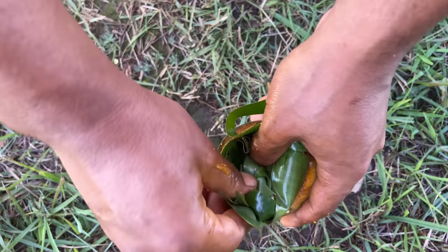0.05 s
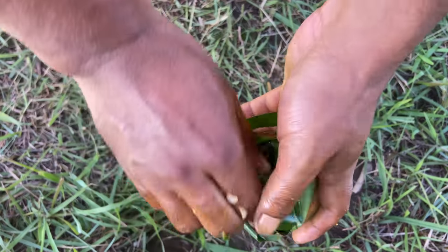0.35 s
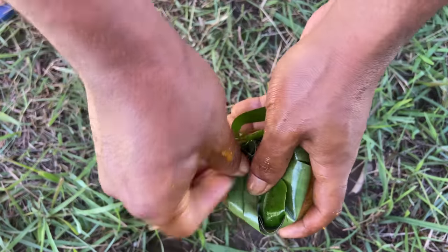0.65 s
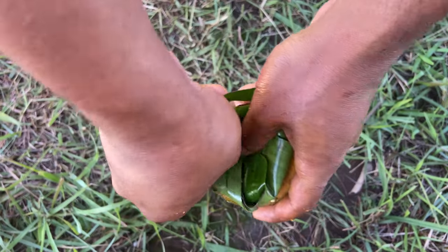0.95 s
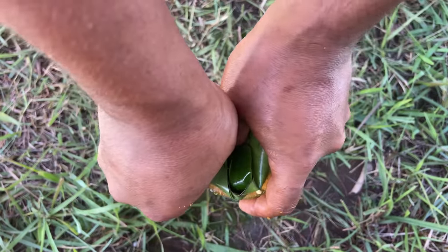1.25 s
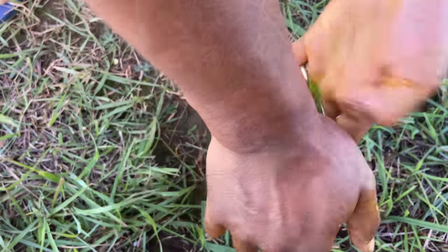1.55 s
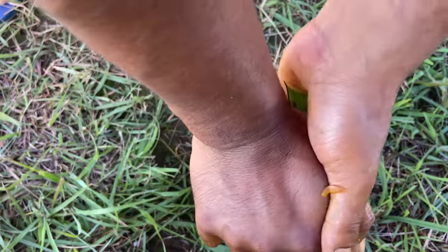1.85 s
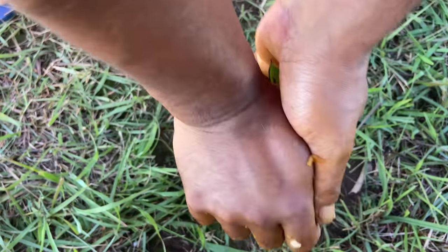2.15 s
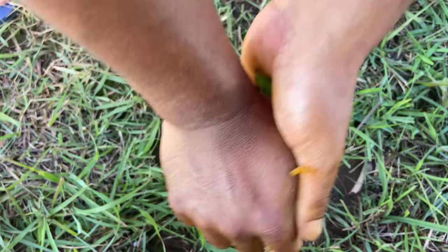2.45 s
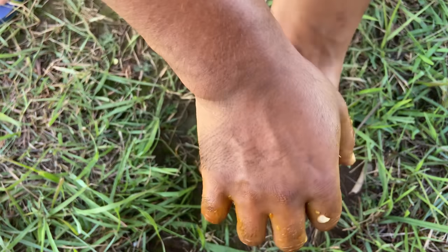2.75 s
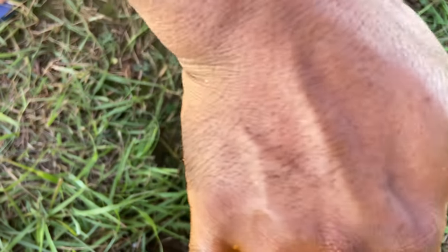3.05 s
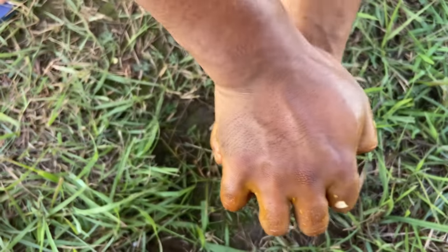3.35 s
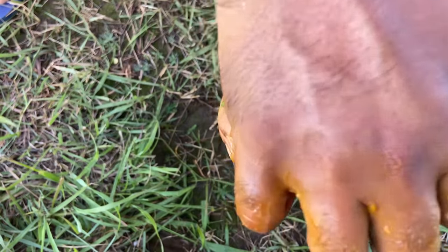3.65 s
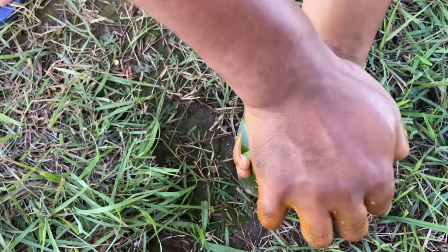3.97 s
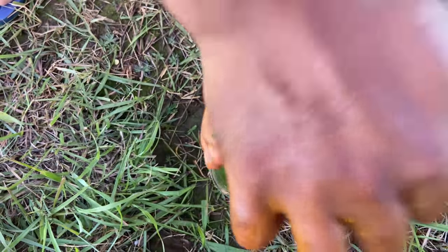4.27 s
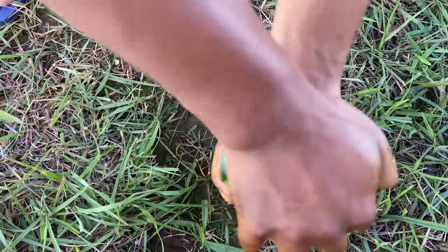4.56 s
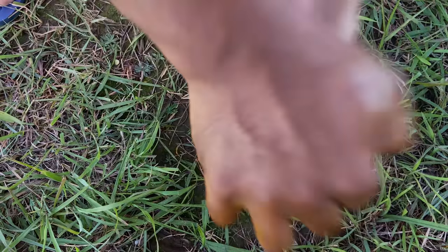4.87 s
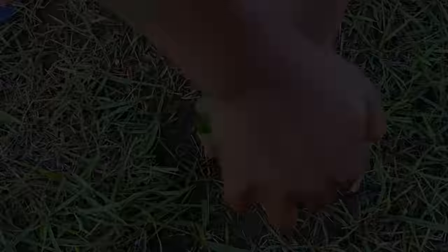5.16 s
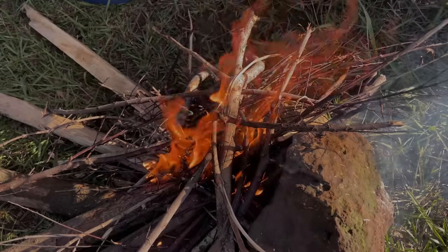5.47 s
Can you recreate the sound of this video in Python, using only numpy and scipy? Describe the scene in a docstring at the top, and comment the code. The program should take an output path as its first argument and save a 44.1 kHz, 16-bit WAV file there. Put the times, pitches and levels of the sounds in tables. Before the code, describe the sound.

Leaf veins crack in quick, sharp clusters while waxy leaves slide over each other, heard close and dry outdoors. Quieter, muffled kneading follows as damp palms press the folded bundle, broken by one more sharp snap. Then a cupped hand pats the packet four times, the last one softer. Everything fades out, and the faint hiss and rumble of a small fire appears at the very end with one twig tick.

```python
"""Leaf veins snap crisply as two hands fold fresh green leaves into a packet, close by, outdoors over grass.
Blades slide over each other in stick-slip friction, trapped air pops, and the palms knead the bundle
and pat it four times. The recorder delays the bass, so each pat is a falling pop.
The scene fades out and a small wood fire fades in."""
import sys
import numpy as np
from scipy import signal
from scipy.fft import rfft, irfft
from scipy.io import wavfile
from scipy.ndimage import uniform_filter1d

SR = 44100
rng = np.random.default_rng(int(sys.argv[2]) if len(sys.argv) > 2 else 0)


def transcribe(u):
    """Save the signal u as a 16-bit wav file named by the first command-line argument.

    u: samples, shape (n,) or (channels, n), limited to [-1, 1]; the rate is SR.
    q: integer samples, one column per channel.
    """
    v = np.clip(np.atleast_2d(u).T, -1, 1)
    q = np.round(v * 32767).astype(np.int16)
    wavfile.write(sys.argv[1], SR, q)


N = 247401
T = np.arange(N) / SR
SCENE_CHANGE_S = 5.241


def amp(db):
    """Decibels to amplitude ratio."""
    return 10 ** (np.asarray(db) / 20)


def unit(x):
    """Normalisation to rms 1."""
    return x / np.sqrt(np.mean(x ** 2))


def add(out, start_s, sound):
    """Superposition: mix a sound in at its start time."""
    i = max(int(start_s * SR), 0)
    out[i:i + len(sound)] += sound[:max(N - i, 0)]


def colour(x, spectrum):
    """Spectral shaping by (frequency_hz, gain_db) points; white noise keeps its level."""
    hz, db = np.transpose(spectrum)
    bins_hz = np.maximum(np.fft.rfftfreq(len(x), 1 / SR), 1)
    gain = amp(np.interp(np.log(bins_hz), np.log(hz), db))
    return irfft(rfft(x) * unit(gain), len(x))


def resonate(x, hz, q):
    """Second-order resonance, with centre and bandwidth capped at a third of the sample rate."""
    hz = min(hz, SR / 3)
    return signal.lfilter(*signal.iirpeak(hz, max(q, hz / (SR / 3)), fs=SR), x)


def ring(t, hz, cycles):
    """Heavily damped oscillation whose envelope peaks at 1 after the given number of cycles."""
    age = t * hz / cycles
    return age * np.exp(1 - age) * np.sin(2 * np.pi * hz * t)


def swell(start_s, length_s, attack_s, release_s):
    """Exponential growth up to the start of a movement, a hold, then exponential decay."""
    rise = np.minimum(T - start_s, 0) / attack_s
    fall = np.maximum(T - start_s - length_s, 0) / release_s
    return np.exp(rise - fall)


def movements(table, attack_s, release_s):
    """Incoherent movements add in power: one gain curve for each level column of the table."""
    power = sum(amp(levels_db)[:, None] ** 2 * swell(start_s, length_s, attack_s, release_s) ** 2
                for start_s, length_s, *levels_db in table)
    return np.sqrt(power)


def fade_out(length_s=0.51):
    """Linear fall in amplitude, reaching silence at the scene change."""
    return np.clip((SCENE_CHANGE_S - T) / length_s, 0, 1)


def stick_slip(per_s, scatter_db, low_hz, high_hz, cycles, wander_db, bands=12):
    """Stick-slip releases as a Poisson process; the favoured pitches shift with the grip."""
    out = np.zeros(N)
    for hz in np.geomspace(low_hz, high_hz, num=bands):
        chance, size = rng.random(N), rng.standard_normal(N)
        wander = np.interp(T, np.linspace(0, T[-1], num=140), rng.standard_normal(140))
        hit = chance < per_s / bands / SR
        kicks = np.zeros(N)
        kicks[hit] = np.sign(size[hit]) * amp(scatter_db * np.abs(size[hit]) + wander_db * wander[hit])
        response = ring(T[:int(10 * cycles / hz * SR)], hz, cycles) * hz
        out += signal.oaconvolve(kicks, response)[:N]
    return unit(out)


def friction(releases, spectrum, steady_s):
    """Source and filter: releases coloured by what rubs, held at an even mean level."""
    rubbing = colour(releases, spectrum)
    local_power = uniform_filter1d(rubbing ** 2, int(steady_s * SR))
    return rubbing / np.sqrt(local_power + np.mean(rubbing ** 2) / 20)


# Spectrum of open air: frequency_hz, gain_db
AIR_SPECTRUM = [(25, -17.5), (70, 1), (150, -16.5), (400, -5.5), (1000, -15), (3000, -24.5), (8000, -28.5),
                (12000, -37), (15500, -32)]
def outdoors(level_db=-64):
    """Ambient noise of still open air, strongest in the bass, fading with the leaf scene."""
    return amp(level_db) * colour(rng.standard_normal(N), AIR_SPECTRUM) * fade_out()


# Spectrum of the flames: frequency_hz, gain_db
FLAME_SPECTRUM = [(30, -7.5), (110, -5), (360, -19), (900, -23.5), (5700, -25), (11400, -39), (16000, -53)]
def fire(level_db=-51, flutter_db=2, tick_s=5.5875, tick_db=-40, fade_in_s=0.27):
    """Combustion noise: flames hiss and rumble with a fluttering level as they fade in; one twig ticks."""
    flutter = unit(uniform_filter1d(rng.standard_normal(N), SR // 40))
    out = amp(level_db + flutter_db * flutter) * colour(rng.standard_normal(N), FLAME_SPECTRUM)
    add(out, tick_s, amp(tick_db) * ring(T[:SR // 20], hz=2600, cycles=0.57))
    return out * np.clip((T - SCENE_CHANGE_S) / fade_in_s, 0, 1) ** 1.18


# Presses of the palms on the bundle: start_s, length_s, rumble_db, stutter_db
PALM_PRESSES = [(0.5, 0.16, -44, -56), (1.15, 0.19, -45, -53.5), (1.38, 0.32, -45, -53),
                (1.635, 0.067, -33.5, -42), (1.78, 0.3, -45.5, -53), (2.225, 0.14, -41, -48),
                (2.55, 0.1, -41.5, -59), (2.8, .09, -33.5, -41), (2.95, 0.43, -44, -52.5),
                (3.22, 0.041, -34.5, -49), (3.38, 0.19, -51, -62.5), (4.19, 0.0072, -44, -59.5),
                (4.52, 0.073, -39, -49)]
# Spectrum of the bundle's deep rumble: frequency_hz, gain_db
RUMBLE_SPECTRUM = [(25, -4.5), (45, 9), (75, -2.5), (160, -1.5), (240, -12.5), (400, -19.5)]
# Spectrum of stuttering skin: frequency_hz, gain_db
STUTTER_SPECTRUM = [(140, -13), (250, 8.5), (340, -1), (520, -9), (700, -16.5), (1400, -36.5)]
# Dull knocks as the grip slips: start_s, relative_level_db, pitch_hz
GRIP_SLIPS = [(1.154, -32.5, 234), (1.466, -27, 218), (1.523, -27.5, 317), (1.617, -34, 245),
              (1.657, -25.5, 90), (1.682, -21, 169), (2.223, -44, 262), (2.533, -33, 464.4),
              (2.59, -29, 264), (2.661, -30, 200), (2.783, -26.5, 178), (2.852, -21.5, 453),
              (2.86, -21.5, 230), (2.879, -34, 302), (4.62, -30.5, 274)]
def kneading(hold_rumble_db=-56, hold_stutter_db=-66, settle_db=-26, settle_stutter_db=-14, slip_db=-1):
    """Slow stick-slip: damp skin creeps over the bundle in dull jerks and knocks when the grip slips."""
    press_rumble, press_stutter = movements(PALM_PRESSES, attack_s=0.027, release_s=0.027)
    # the bundle settles after each pat, in proportion to the push
    settle = sum(amp(push_db + settle_db) * swell(start_s, contact_s, contact_s, release_s=0.034)
                 for start_s, push_db, contact_s, *_ in PALM_PATS)
    rumble_gain = np.hypot(press_rumble, amp(hold_rumble_db) + settle)
    stutter_gain = np.hypot(press_stutter, amp(hold_stutter_db) + amp(settle_stutter_db) * settle)
    deep = stick_slip(per_s=160, scatter_db=2, low_hz=50.7, high_hz=255, cycles=0.47, wander_db=2)
    skin = stick_slip(per_s=220, scatter_db=9, low_hz=189, high_hz=785, cycles=0.66, wander_db=0)
    out = rumble_gain * friction(deep, RUMBLE_SPECTRUM, steady_s=0.14)
    out += stutter_gain * friction(skin, STUTTER_SPECTRUM, steady_s=0.065)
    for start_s, level_db, pitch_hz in GRIP_SLIPS:
        add(out, start_s, amp(level_db + slip_db) * ring(T[:SR // 10], pitch_hz, cycles=0.47))
    return out * fade_out()


# Modes of the folded blades: pitch_hz, quality_factor, gain_db
LEAF_MODES = [(1815, 12, -5.5), (3410, 17, -11.5), (4840, 10, -11)]
def blade_resonance(x):
    """Modal response: the stiff folded blades add their own ringing to what excites them."""
    return x + sum(amp(gain_db) * resonate(x, pitch_hz, q) for pitch_hz, q, gain_db in LEAF_MODES)


def flicker(spread_db, per_s):
    """Random amplitude modulation as the surfaces catch and let go."""
    levels = rng.standard_normal(2000)
    return amp(spread_db * np.interp(T * per_s, np.arange(len(levels)), levels))


# Strokes of blade over blade: start_s, length_s, crinkle_db, scrape_db
BLADE_STROKES = [(0.045, 0.035, -42, -51), (0.175, 0.042, -50, -51.5), (0.31, 0.15, -56.5, -54),
                 (0.53, 0.38, -63, -63.5), (1.23, 0.053, -68, -63.5), (1.475, 0.024, -51.5, -48),
                 (1.66, 0.096, -89, -62.5), (1.79, 0.2, -84, -65), (2.0, 0.17, -65, -63),
                 (2.28, 0.17, -72, -68.5), (2.51, .13, -62.5, -59.5), (2.77, 0.026, -64.5, -56),
                 (3.42, 0.037, -62, -60), (3.58, 0.0064, -66.5, -81), (3.98, 0.054, -69.5, -64),
                 (4.5, 0.097, -64, -63.5), (4.62, .08, -69.5, -67), (4.92, 0.097, -71, -85)]
# Spectrum of the fine crinkle: frequency_hz, gain_db
CRINKLE_SPECTRUM = [(1200, -22.5), (2500, 2.5), (3800, 2), (5500, 0.5), (8000, -1), (9500, -7),
                    (16000, -22.5)]
# Spectrum of the coarse scrape: frequency_hz, gain_db
SCRAPE_SPECTRUM = [(300, -28.5), (800, -8.5), (1400, -5.5), (2400, -9), (3300, -16.5), (5000, -27)]
# Runs of ticks as a fold is bent tighter: start_s, length_s, level_db
FOLD_CRACKLES = [(0.3, 0.2, -56), (0.6, .22, -55.5), (0.97, 0.35, -62), (1.6, .3, -73), (2.1, 0.024, -58),
                 (2.26, 0.064, -64.5), (3.38, 0.049, -71)]
def sliding(attack_s=0.02, release_s=0.018, stir_crinkle_db=-76, stir_scrape_db=-73, catch_db=-10):
    """Sliding friction of waxy blades: a fine crinkle, a squeaky scrape of folds and ticks from edges."""
    strokes = movements(BLADE_STROKES, attack_s, release_s)
    crinkle_gain, scrape_gain = strokes * flicker(spread_db=2.5, per_s=67)
    fine = stick_slip(per_s=3100, scatter_db=2, low_hz=2360, high_hz=14000, cycles=0.71, wander_db=4)
    coarse = stick_slip(per_s=4400, scatter_db=5.5, low_hz=578, high_hz=3320, cycles=1.4, wander_db=6.5)
    edges = stick_slip(per_s=380, scatter_db=4.5, low_hz=3400, high_hz=7600, cycles=0.36, wander_db=7)
    crinkle = friction(fine, CRINKLE_SPECTRUM, steady_s=0.053)
    scrape = friction(coarse, SCRAPE_SPECTRUM, steady_s=0.18)
    ticks = unit(blade_resonance(edges))
    # edges also catch during each stroke
    tick_gain = movements(FOLD_CRACKLES, attack_s, release_s)[0] + amp(catch_db) * crinkle_gain
    # the leaves stir a little between strokes
    crinkle_gain = np.hypot(crinkle_gain, amp(stir_crinkle_db) * fade_out())
    scrape_gain = np.hypot(scrape_gain, amp(stir_scrape_db) * fade_out())
    return crinkle_gain * crinkle + scrape_gain * scrape + tick_gain * ticks


# Hollow pops of air between the folds: start_s, level_db, pitch_hz
AIR_POCKETS = [(0.2280, -29, 1820), (0.438, -32, 1510), (0.6923, -31.5, 1686), (0.8390, -40, 1480),
               (1.3878, -37.5, 1544), (1.9990, -27, 2420)]
def pockets(decay_s=0.0037):
    """Cavity resonance: a fold gives way and the air behind it rings for a few cycles."""
    out, t = np.zeros(N), T[:SR // 20]
    for start_s, level_db, pitch_hz in AIR_POCKETS:
        add(out, start_s, amp(level_db) * np.exp(-t / decay_s) * np.sin(2 * np.pi * pitch_hz * t))
    return out


# Pats of the cupped palm: start_s, push_db, contact_s, cup_hz, slap_db
PALM_PATS = [(3.1765, -1, 0.0041, 290, -30.5), (3.7704, -4, 0.0047, 1150, -29),
             (4.333, -1, 0.00493, 800, -29), (4.9106, -9, 0.0057, 760, -34)]
# Spectrum of slapped leaves: frequency_hz, gain_db
SLAP_SPECTRUM = [(250, -6.5), (700, 2), (1600, 0.5), (2500, -0.5), (3500, -1.5), (7500, -6), (10500, -11.5),
                 (16000, -29.5)]
def pats(sag=0.62, cup_db=-2, flesh_db=-3, hollow_db=-4,
         slap_delay_s=0.008, slap_width_s=0.006, brush_db=-21, brush_s=0.021, crunch_db=3):
    """Impact: the palm traps a pressure pulse against the packet, and the leaves crunch as they give."""
    out, lead_s = np.zeros(N), 0.05
    t = T[:SR // 5] - lead_s
    for start_s, push_db, contact_s, cup_hz, slap_db in PALM_PATS:
        contact = np.clip(t * SR, 0, 1) * np.clip((contact_s - t) * SR, 0, 1)
        push = contact * (1 - sag * t / contact_s)
        # the flesh rounds the edges of the pulse and the cupped palm rings with them
        push = signal.sosfilt(signal.butter(2, cup_hz, fs=SR, output="sos"), push)
        push = push + amp(cup_db) * resonate(push, cup_hz, q=4)
        flesh_wobble = amp(flesh_db) * resonate(push, hz=112, q=2.7)
        cupped_hands_hollow = amp(hollow_db) * resonate(push, hz=300, q=5)
        thump = push + flesh_wobble + cupped_hands_hollow
        crush = (t > 0) * np.exp(-0.5 * ((t - slap_delay_s) / slap_width_s) ** 2)
        # loose blades brush the hand just before and after the packet is flattened
        brush = amp(brush_db) * np.exp(-np.abs(t - slap_delay_s) / brush_s)
        crunch = amp(crunch_db * unit(uniform_filter1d(rng.standard_normal(len(t)), size=30)))
        burst = rng.standard_normal(len(t)) * crunch * (crush + brush)
        slap = blade_resonance(colour(burst, SLAP_SPECTRUM))
        add(out, start_s - lead_s, amp(push_db) * thump + amp(slap_db) * slap)
    return out


# Leaf veins breaking: start_s, relative_level_db, pitch_hz, tail_re_snap_db
VEIN_SNAPS = [(0.0077, -18.5, 6800, -26), (0.0149, -23, 5270, -27), (0.1312, -30, 6400, -40),
              (0.207, -23, 7340, -15.5), (0.2268, -32, 2400, -5), (0.2745, -26, 4300, -9),
              (0.4377, -35.5, 3330, -1), (0.501, -25, 7660, -30), (0.5447, -27.5, 6040, -24),
              (0.6232, -26.5, 4970, -40), (0.6442, -31, 5750, -7.5), (0.654, -24, 5340, -28),
              (0.6609, -17, 6400, -24), (0.6824, -17.5, 7100, -21), (0.6944, -24, 3240, -13.5),
              (0.7126, -26, 7300, -20), (0.723, -23.5, 8700, -40), (0.751, -22.5, 6850, -37),
              (0.7605, -23, 6500, -36), (0.776, -15.5, 6360, -29), (0.7847, -15, 5500, -31),
              (0.802, -12, 5670, -28), (0.8248, -28.5, 3130, -14), (0.888, -42.5, 4640, -3.5),
              (0.935, -18, 5500, -21), (0.937, -7.5, 6200, -29), (0.9504, -17, 5200, -20.5),
              (0.968, -12.5, 5100, -9), (0.978, -19.5, 5300, -8.5), (1.0571, -32.5, 5640, -23),
              (1.142, -30.5, 6500, -18), (1.1606, -30, 4740, -35), (1.261, -21, 5570, -27.5),
              (1.3883, -34, 1860, -5), (1.4633, -28, 5960, -41), (1.793, -36.5, 3960, -22),
              (1.9601, -44.5, 3050, 4.5), (1.992, -36.5, 5500, -11.5), (1.9988, -25.5, 4900, -2.5),
              (2.0334, -17, 4970, -16.5), (2.045, -5, 6170, -20.5), (2.426, -40.5, 4100, -11),
              (2.63, -53.5, 2500, 7.5)]
def snaps(gain_db=0.5, strain_db=-28.5, strain_s=0.00095, tear_db=-13, tear_s=0.00091,
          tail_t60_s=0.036, fold_db=-1, cutoff_hz=12000):
    """Fracture frees a vein's elastic energy: the blade flicks, fibres tear and the folds ring briefly."""
    out, t = np.zeros(N), T[:2048]
    for start_s, level_db, pitch_hz, tail_db in VEIN_SNAPS:
        gain = amp(level_db + gain_db)
        tear_noise, tail_noise, strain_noise = rng.standard_normal((3, len(t)))
        # strained fibres crackle just before the vein gives way
        crackle = unit(resonate(strain_noise * np.abs(strain_noise), pitch_hz, q=1))
        strain = amp(strain_db) * crackle * np.exp((t - t[-1]) / strain_s)
        add(out, start_s - t[-1], gain * strain)
        flick = ring(t, pitch_hz, cycles=0.57)
        tear = amp(tear_db) * unit(resonate(tear_noise, 1.2 * pitch_hz, q=0.5)) * np.exp(-t / tear_s)
        # every snap shakes other folds, which lend it their own colour
        folds = sum(resonate(tail_noise, pitch_hz * ratio, q=9) for ratio in rng.uniform(0.47, 1.15, 2))
        rustle = unit(resonate(tail_noise, 0.51 * pitch_hz, q=0.2)) + amp(fold_db) * unit(folds)
        rustle = unit(resonate(rustle, 1.1 * pitch_hz, q=0.65))
        tail = rustle * amp(tail_db - 60 * t / tail_t60_s)
        add(out, start_s, gain * (flick + tear + tail))
    # sappy leaves have little of the highest treble
    return signal.sosfilt(signal.butter(2, cutoff_hz, fs=SR, output="sos"), blade_resonance(out))


def scene():
    """Superposition of direct sound: every source is close and dry, in one channel."""
    leaves = snaps() + pockets() + sliding() + kneading() + pats()
    return (leaves + outdoors() + fire())[None]


def record(dry, lowest_crossover_hz=125, bass_cut_hz=64, treble_cut_hz=15900):
    """Group delay: all-pass crossovers an octave apart delay low notes most; both band edges are cut."""
    for crossover_hz in lowest_crossover_hz * 2 ** np.arange(7):
        denominator = signal.butter(2, crossover_hz, fs=SR)[1]
        dry = signal.lfilter(denominator[::-1], denominator, dry)
    highpass = signal.butter(6, bass_cut_hz, "highpass", fs=SR, output="sos")
    lowpass = signal.ellip(8, 0.2, 80, treble_cut_hz, fs=SR, output="sos")
    return signal.sosfilt(lowpass, signal.sosfilt(highpass, dry))


dry = scene()
out = record(dry)
transcribe(out)
```